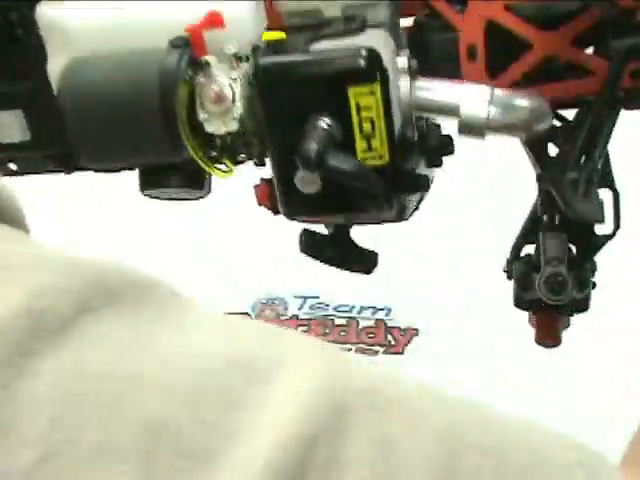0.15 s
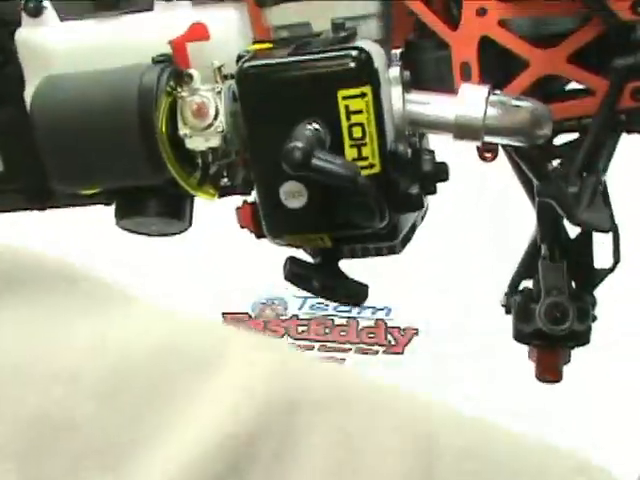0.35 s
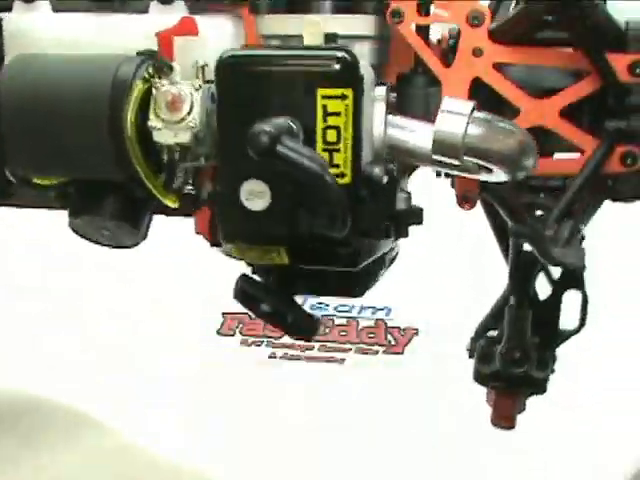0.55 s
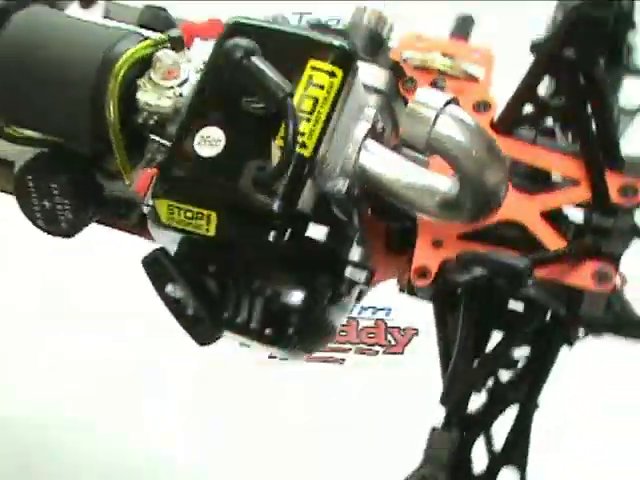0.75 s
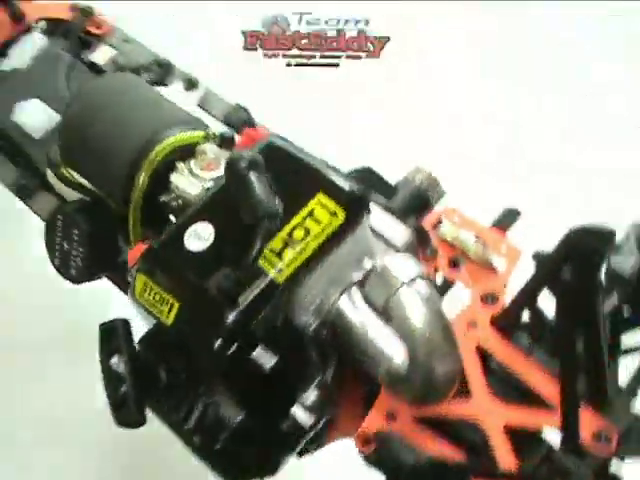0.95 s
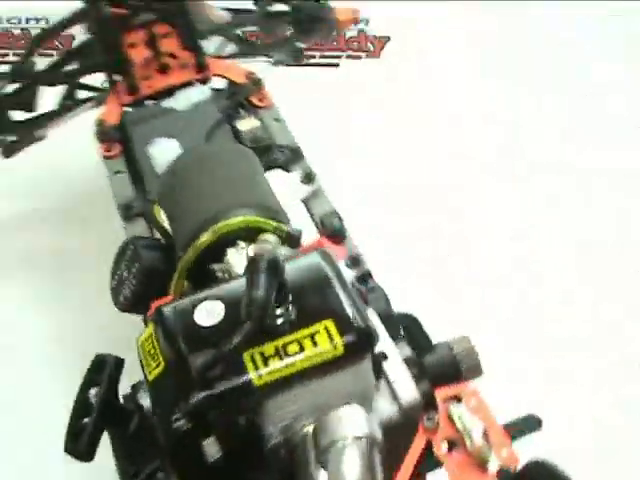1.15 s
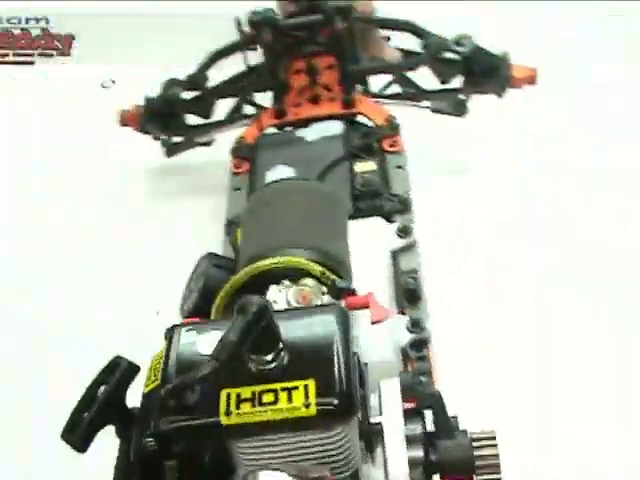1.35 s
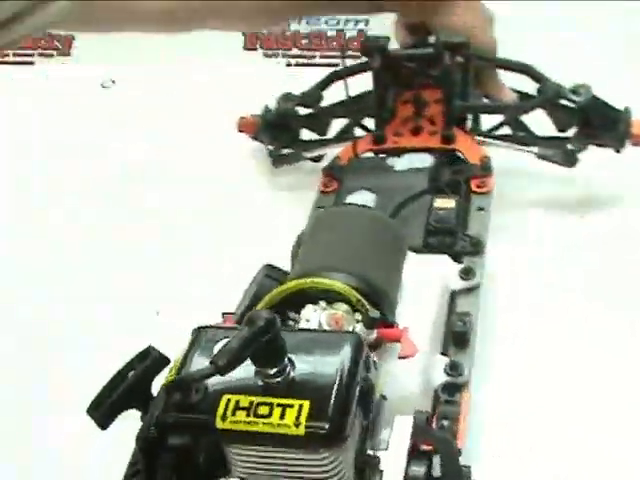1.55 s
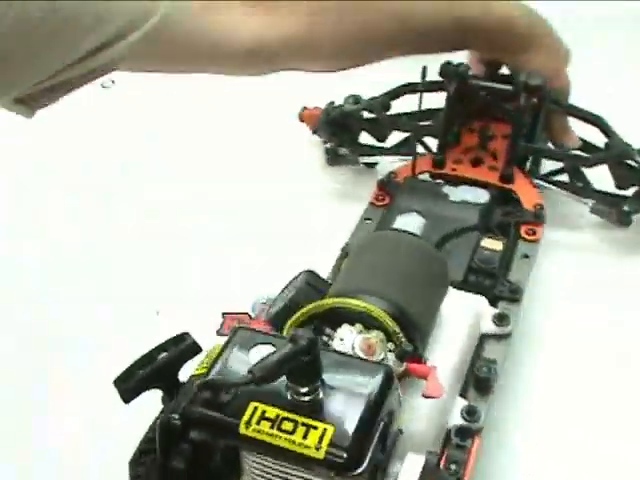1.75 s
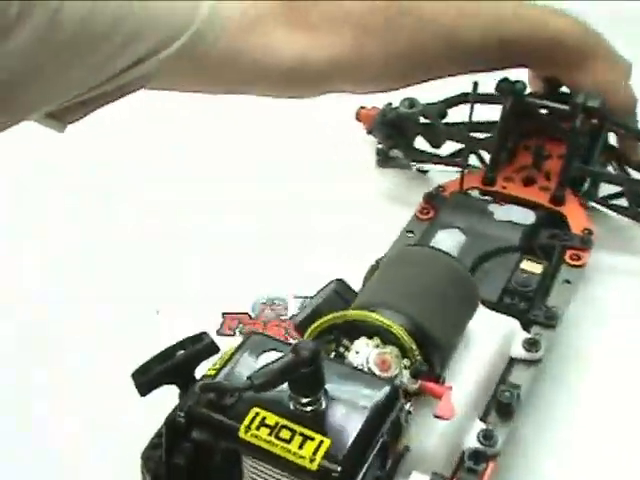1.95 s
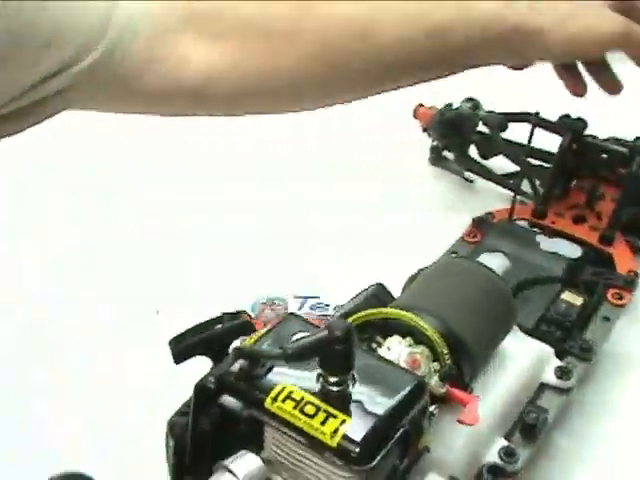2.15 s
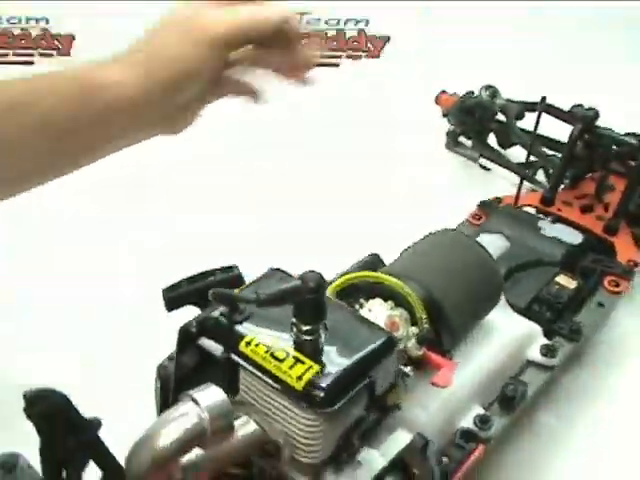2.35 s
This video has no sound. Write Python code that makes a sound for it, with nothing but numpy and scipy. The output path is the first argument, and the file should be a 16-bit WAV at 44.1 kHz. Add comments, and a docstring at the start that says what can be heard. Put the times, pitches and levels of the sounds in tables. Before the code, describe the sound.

Close handling of a metal and plastic model chassis on a table in a small room: scraping bursts, sparse link clicks, a run of woody thumps and a final loud shove, over faint hiss and hum.

```python
"""On a table, near a small camera, a heavy model chassis is dragged and turned while its loose links tick;
then it is knocked down in a run of blows and shoved across the top. Drags are random stick-slip clicks that
ring six parts: table top, floor plate, frame, arms, links and contact hiss. Hits are short noise bursts:
knocks ring all but the table top, ticks only the upper four, and both add notes of their own. Shaped noise
and sines make the camera's hiss, hum and motor whine."""
import sys
import numpy as np
from scipy import signal
from scipy.fft import rfft, irfft
from scipy.io import wavfile
from scipy.ndimage import uniform_filter1d

SR = 44100
rng = np.random.default_rng(int(sys.argv[2]) if len(sys.argv) > 2 else 0)


def store_pcm(level_fs):
    """Save levels as 16-bit WAV."""
    pcm = np.round(np.clip(level_fs, -1, 1) * 32767).astype(np.int16)
    wavfile.write(sys.argv[1], SR, np.atleast_2d(pcm).T)


N = 105928
T = np.arange(N) / SR
RISE_S = .0006  # how fast hits and ticks build up


def undb(db):
    """Turn decibels into a plain gain."""
    return 10 ** (np.asarray(db) / 20)


def unit(x):
    """Scale a sound to an average (rms) level of 1."""
    return x / np.sqrt(np.mean(x ** 2))


def band(x, lo_hz, hi_hz):
    """Keep the sound between two frequencies."""
    sos = signal.butter(2, [lo_hz, min(hi_hz, .45 * SR)], "bandpass", fs=SR, output="sos")
    return signal.sosfilt(sos, x)


def fade(t, t60):
    """Die away by 60 dB in t60 seconds."""
    return np.exp(-np.log(1000) * t / max(t60, .002))


def walk(rate):
    """Wander between random levels, about `rate` of them a second, joined by ramps; rms 1."""
    k = int(SR / rate)
    steps = np.repeat(rng.standard_normal(N // k + 1), k)
    return unit(uniform_filter1d(steps, k)[:N])


def on_log(hz, table):
    """Read a table of values against frequency, joining its points on a log frequency scale."""
    table = np.array(table)
    return np.interp(np.log(np.maximum(hz, 1)), np.log(table[:, 0]), table[:, 1])


def add(into, s, x):
    """Mix a short sound in at s seconds."""
    i = int(s * SR)
    into[..., i:i + x.shape[-1]] += x[..., :N - i]


def ring(db, hz, rise_s, t60):
    """A struck note: a quarter second of sine that builds up, then dies away."""
    t = T[:SR // 4]
    return undb(db) * np.sin(2 * np.pi * hz * t) * (1 - np.exp(-t / rise_s)) * fade(t, t60)


def clatter(t60):
    """The force of one hit: a first blow and a dying burst of contacts, with the energy of 10 ms at rms 1."""
    t = T[:SR // 10]
    burst = rng.standard_normal(len(t)) * (1 - np.exp(-t / RISE_S)) * fade(t, t60)
    burst = burst / np.sqrt(np.sum(burst ** 2))
    first_blow = undb(-13) * (np.arange(len(t)) == int(RISE_S * SR))
    burst = burst + first_blow
    return burst * np.sqrt(SR / 100 / np.sum(burst ** 2))


SLIPS_PER_S, SLIP_SCATTER_DB = 1800, 8
GRAIN_SHARE = 0.5  # share of the rub's power that is clicks; the rest is smooth noise
JUDDER_HZ, JUDDER_DB = 110, 1.3  # random steps per second, spread
WANDER_HZ, WANDER_DB = 44.34, 1.5  # the contact point wanders, so each part swells on its own
# strong drags: [t/s, then level/dB of table top, floor plate, frame, arms, links, contact hiss]
DRAG_LEVELS = [
    [(0.0, -31.5, -24.5, -28.5, -37.5, -41, -46), (0.036, -47.5, -25, -29, -36, -38, -48),
     (0.058, -42, -31.5, -33, -38, -35.5, -45), (0.094, -55, -43, -43, -48, -68, -70),
     (0.102, -52, -49, -50, -48, -47, -58), (0.116, -58, -50, -48, -50, -58, -69),
     (0.126, -59, -52, -62, -56, -43.5, -48), (0.154, -57, -49.5, -61, -65, -66, -73),
     (0.17, -59, -63, -62, -74, -70, -64)],
    [(0.238, -31, -34, -38, -33, -33, -38), (0.248, -28.5, -27.5, -20, -19.5, -28.5, -30.5),
     (0.27, -45, -21, -25.5, -21.5, -28.5, -32.5), (0.312, -47, -26, -18, -24.5, -27.5, -31.5),
     (0.342, -40, -20, -17.5, -24, -31, -33.5)],
    [(0.342, -29, -27, -19.5, -32, -31, -33), (0.372, -53, -29, -23, -34, -36, -36.5),
     (0.412, -37.5, -24, -28.5, -35.5, -35, -42.5), (0.462, -42, -25, -37, -37.5, -46, -55),
     (0.474, -61, -33, -34, -34.5, -50, -56), (0.5, -38, -38.5, -37, -40.5, -45.5, -53),
     (0.522, -44, -43.5, -42, -54, -58, -67), (0.548, -62, -54, -53, -54, -56, -66),
     (0.58, -46, -52, -55, -76, -68, -81)],
    [(2.196, -14.5, -37, -21, -23.5, -24.5, -26.5), (2.224, -22.5, -19.5, -36.5, -32.5, -33.5, -33.5),
     (2.244, -10.5, -33, -24.5, -31, -28, -30), (2.256, -12, -30, -26, -31, -28.5, -28),
     (2.268, -16.5, -19.5, -25.5, -29, -29.5, -32), (2.292, -19, -25.5, -31.5, -33.5, -31.5, -36),
     (2.318, -28.5, -38.5, -40, -43.5, -40, -45), (2.4, -37.5, -50, -55, -57, -56.5, -65)],
]
# light rubbing while the chassis is shifted: [t/s, then level/dB of the same six parts]
RUB_LEVELS = [
    [(0.6, -60, -52.5, -56, -61, -61, -73), (0.7, -60.5, -59, -55, -54, -54.5, -56.5),
     (0.83, -61, -45, -46.5, -47, -46.5, -61), (0.9, -63, -56, -65, -73, -66, -69)],
    [(1.83, -63, -53, -62, -60, -59, -66), (1.854, -53, -46, -50, -56, -61, -64),
     (1.98, -50, -71, -51, -53, -48, -55)],
    [(2.0, -43, -44.5, -52.5, -62, -54, -85), (2.132, -54.5, -40.5, -46, -48.5, -50, -47.5),
     (2.194, -39, -33, -34, -34.5, -33, -39)],
]


def drags():
    """Dragging: surfaces stick and slip in random clicks over a finer, juddering rub; one force per part."""
    chance = rng.random((2, N))
    slips = (chance[0] < SLIPS_PER_S / SR) * undb(SLIP_SCATTER_DB * chance[1])
    clicks = np.sqrt(GRAIN_SHARE) * unit(slips - slips.mean())
    rub = clicks + np.sqrt(1 - GRAIN_SHARE) * rng.standard_normal(N)
    rub = unit(rub * undb(JUDDER_DB * walk(JUDDER_HZ)))
    force = np.zeros((len(PART_RANGES), N))
    for rows in map(np.array, DRAG_LEVELS + RUB_LEVELS):
        for k in range(len(force)):
            level_db = np.interp(T, rows[:, 0], rows[:, 1 + k], -200, -200)  # silent outside the drag
            force[k] += rub * undb(level_db)
    return force * undb(WANDER_DB * np.array([walk(WANDER_HZ) for _ in force]))


# knocks on the table: [t/s, base level/dB, then level/dB against the base of table top, plate, frame, arms,
# links, hiss, then clatter t60/s, plate note f/Hz, note level/dB against the base]
KNOCK_LIST = [(1.8, -15.5, -16, -15, -13, -22.5, -22, -28, 0.094, 582, -0.5),
              (1.826, -28, -32, -35, -8, -10, -22, -36, 0.04, 564, -26),
              (1.872, -37.5, -13, -4, -20, -19, -15, -22, 0.052, 570, 1),
              (1.897, -8.5, -19, -17.5, -16.5, -15.5, -17, -20, 0.048, 500, -5.5),
              (1.915, -23, -12, -8, -11, -14.5, -14, -15.5, 0.15, 710, -5.5),
              (1.951, -28, -10, -16, -16, -33, -34, -32, 0.1, 510, 1),
              (1.985, -13.5, -14.5, -16.5, -15, -24, -22, -27.5, 0.094, 580, 2.5),
              (2.006, -21, -7.5, -38, -12, -14, -18.5, -25, 0.034, 604, -12),
              (2.193, -9, -9, -11, -18, -18, -19, -24, 0.042, 507, -3),
              (2.361, -23.5, -1.5, -32, -30, -35, -38, -38, 0.062, 520, -15)]
# notes of the table top under a knock: [f/Hz, level/dB against the table top's level, t60/s]
TABLE_NOTES = [(170.4, 3, 0.075), (309, -2, 0.21)]
NOTE_T60_S = 0.043


def knocks(force):
    """Knocks: a clatter shakes all parts but the table top, which sounds clean notes beside a plate note."""
    notes = np.zeros(N)
    for s, db, top_db, *rel, t60, hz, note_db in KNOCK_LIST:
        add(force[1:], s, undb(db + np.array(rel))[:, None] * clatter(t60))
        add(notes, s, ring(db + note_db, hz, 0.002, NOTE_T60_S))
        for table_hz, table_db, table_t60 in TABLE_NOTES:
            add(notes, s, ring(db + top_db + table_db, table_hz, 0.0026, table_t60))
    return notes


# ticks of loose links: [t/s, base level/dB, then level/dB against the base of frame, arms, links, hiss,
# then own ring f/Hz, ring level/dB against the base, ring t60/s, clatter t60/s]
TICK_LIST = [(0.0994, -33, -7, -14, -21.5, -30, 1960, -11, 0.061, 0.019),
             (0.1233, -35.5, -8, -16, -23, -16, 1480, -13, 0.05, 0.023),
             (0.5906, -45, -13, -9, -8, -33, 1750, -4, 0.05, 0.036),
             (0.62, -32, -11.5, -9, -28, -30, 2180, -16, 0.048, 0.0069),
             (0.6675, -40.5, -22, -28, -9, -8, 1750, -9, 0.05, 0.023),
             (0.7055, -28.5, -25, -22, -9, -16, 5960, -6, 0.054, 0.074),
             (0.7486, -32, -8, -28, -11, -12, 1420, -7, 0.037, 0.088),
             (0.7696, -23, -17.5, -30, -15, -18, 5380, -5.5, 0.066, 0.15),
             (0.9096, -15.5, -15, -14.5, -11, -15.5, 1730, -8.5, 0.11, 0.076),
             (1.064, -31, -21, -18.5, -19.5, -19.5, 1970, -8, 0.06, 0.035),
             (1.5445, -41.5, -21, -13, -15, -14, 1860, -5, 0.05, 0.094),
             (1.612, -40.5, -15, -17, -34, -24, 1850, 3.5, 0.026, 0.018),
             (2.0833, -42, -15, -18, -32, -38, 1810, -6, 0.046, 0.013)]


def ticks(force):
    """Loose links tick: a small clatter shakes the upper four parts and the link rings at its own pitch."""
    rings = np.zeros(N)
    for s, db, *rel, hz, ring_db, ring_t60, t60 in TICK_LIST:
        add(force[2:], s, undb(db + np.array(rel))[:, None] * clatter(t60))
        add(rings, s, ring(db + ring_db, hz, RISE_S, ring_t60))
    return rings


# table legs boom, thin metal whistles: [t/s, level/dB before rise and fade, f/Hz, rise/s, t60/s]
LONG_RINGS = [(1.902, -31, 73.44, 0.004, .2), (2.2, -30, 67.9, 0.0067, 0.38), (2.3, -24, 68, 0.0059, 0.24),
              (.77, -45, 9800, .001, .08), (.771, -42, 6100, .002, .06), (.785, -41, 4700, .004, .08),
              (.912, -36, 1147, .002, .07), (.911, -33, 3600, .002, .1), (2.212, -31, 9630, .004, 0.14),
              (2.285, -40, 9660, .006, 0.12)]


def long_rings():
    """Table legs and thin metal parts ring on as single dying sines."""
    rings = np.zeros(N)
    for s, db, hz, rise_s, t60 in LONG_RINGS:
        add(rings, s, ring(db, hz, rise_s, t60))
    return rings


# range of table top, floor plate, frame, arms, links, contact hiss: [low f/Hz, high f/Hz]
PART_RANGES = [(175, 417), (470, 900), (1040, 2063), (1900, 2863), (2850, 7330), (7000, 10000)]
# natural notes of table and chassis: [f/Hz, level/dB with longer notes scaled down, t60/s]
BODY_MODES = [(185, -2, .15), (245, 2, .14), (280, -2, .12), (338, -2, .1), (385, -11, .08), (520, -6, .06),
              (570, 0, .08), (650, 0, .08), (740, -3, .06), (790, -7, .05), (1150, -6, .04),
              (1270, -3, .05), (1360, 0, .07), (1530, -5, .05), (1690, -2, .07), (1800, -3, .06),
              (1970, 0, .06), (2240, -3, .05), (2410, -3, .04), (2560, -1, .07), (3300, 0, .03),
              (3700, -2, .03), (4300, -3, .03), (5200, -3, .03), (6100, -4, .03)]
# dull thud of each part in the same order: [level/dB against its notes]
THUD_LEVELS = [-2.5, -9.5, 10.5, 4, 18, 0]


def parts():
    """How each part answers one click: its notes plus an unpitched thud, kept to its own range; energy 1."""
    t = T[:SR // 3]
    click = 1. * (t == 0)
    answers = []
    for (lo, hi), thud_db in zip(PART_RANGES, THUD_LEVELS):
        answer = undb(thud_db) * unit(band(click, lo, hi))
        modes = [undb(db) * np.sin(2 * np.pi * hz * t) * fade(t, t60) / np.sqrt(t60)
                 for hz, db, t60 in BODY_MODES if lo <= hz < hi]
        if modes:
            answer = band(answer + unit(sum(modes)), lo, hi)
        answers.append(unit(answer) / np.sqrt(len(t)))
    return answers


PLATE_SPLIT_HZ = 690
# balance of the plate as the weight shifts: [t/s, upper against lower notes level/dB]
PLATE_BALANCE = [(0.05, -3), (0.25, 9), (0.3, 5), (0.34, -4), (0.42, -7), (0.5, -4), (0.8, 2), (2.05, -6),
                 (2.2, -2)]


def tilt_plate(plate):
    """As the weight shifts, the plate favours its upper or its lower notes."""
    lower = signal.sosfiltfilt(signal.butter(4, PLATE_SPLIT_HZ, fs=SR, output="sos"), plate)
    tilt = undb(np.interp(T, *np.array(PLATE_BALANCE).T))
    return (lower + tilt * (plate - lower)) * np.sqrt(2 / (1 + tilt ** 2))


RING_FLUTTER_DB = 4  # furthest swing up or down


def chassis():
    """Drags shake every part, knocks all but the table top, ticks the upper four; higher rings flutter."""
    force = drags()
    notes = knocks(force)
    rings = ticks(force) + long_rings()
    flutter = band(rings * undb(RING_FLUTTER_DB * np.tanh(walk(320))), 470, 15000)
    body = [signal.fftconvolve(f, answer)[:N] for f, answer in zip(force, parts())]
    body[1] = tilt_plate(body[1])
    return band(rings, 30, 360) + flutter + notes + sum(body)


FAINT_PER_S, FAINT_DB = 60, -54  # ticks are up to 10 dB softer than this
FAINT_HZ, FAINT_T60_S = 1850, 0.025


def jiggle():
    """One loose link jiggles faintly all along: scattered ticks, each ringing two close tones."""
    chance, t = rng.random((2, N)), T[:SR // 10]
    faint_ticks = (chance[0] < FAINT_PER_S / SR) * undb(FAINT_DB - 10 * chance[1])
    link = np.sin(2 * np.pi * FAINT_HZ * t) + 0.39 * np.sin(2 * np.pi * 1.1 * FAINT_HZ * t)
    return signal.fftconvolve(faint_ticks, link * fade(t, FAINT_T60_S))[:N]


# how the sound reaches the left side ahead of the right: [f/Hz, lead/radians]
LEFT_LEAD = [(60, 0.48), (260, 1.42), (780, 0.85), (1400, 0.58), (2400, 0.33), (5000, 0.36), (9000, -0.28),
             (14000, -1.03)]
# loudness of left against right: [f/Hz, level/dB]
LEFT_LEVEL = [(100, -0.5), (500, .9), (5000, 1.6), (14000, -1)]


def near_sound(dry):
    """The direct sound in stereo: timing and level differ between left and right with frequency."""
    hz = np.fft.rfftfreq(N, 1 / SR)
    lead, left_db = on_log(hz, LEFT_LEAD), on_log(hz, LEFT_LEVEL)
    # each side takes half the difference
    sides = [np.exp(.5j * w * lead) * undb(w * left_db / 2) for w in (1, -1)]
    return np.array([irfft(rfft(dry) * side, N) for side in sides])


ROOM_T60_S, ROOM_DB, ROOM_TOP_HZ = 0.16, -14.5, 8900


def room(dry):
    """Room echoes: a separate dying noise tail for each side smears the sound."""
    t = T[:SR // 2]
    echoes = []
    for _ in range(2):
        noise = band(rng.standard_normal(len(t)), 84, ROOM_TOP_HZ)
        tail = unit(noise * fade(t, ROOM_T60_S) * (t > .006))  # the first echo comes after 6 ms
        echoes.append(signal.fftconvolve(dry, tail)[:N])
    return np.array(echoes) * undb(ROOM_DB) / np.sqrt(len(t))


HISS_LEVEL_DB, FLICKER_DB = -52.5, .8  # rms of the middle hiss before flicker, spread of the flicker
HUM_HZ, HUM_WIDTH_HZ, HUM_DB = 55, 2.5, -56  # middle pitch, pitch spread, rms before its wavering
# colour of the hiss: [f/Hz, relative level/dB]
HISS_COLOUR = [(53, -44), (90, -13.5), (122, -11), (488, -17.5), (593, -16.5), (769, -21.5), (1910, -19.5),
               (2230, -21), (16000, -30.5)]
# stereo width of the hiss: [f/Hz, side against middle level/dB]
HISS_WIDTH = [(60, -33), (110, -15), (200, -15), (380, -6), (700, 0.5), (1290, -4), (8120, -4.5),
              (15000, -16)]
# thin motor lines: [f/Hz, peak level/dB before wavering]
MOTOR_LINES = [(600.5, -57), (958.2, -69), (1922, -73)]


def camera():
    """The camera: coloured noise hiss, a low wavering hum, a soft rumble and thin motor tones."""
    hz = np.fft.rfftfreq(N, 1 / SR)
    shape = undb(on_log(hz, HISS_COLOUR)) * (hz > 85)
    mid = irfft(rfft(rng.standard_normal(N)) * shape, N)
    side = irfft(rfft(rng.standard_normal(N)) * shape * undb(on_log(hz, HISS_WIDTH)), N)
    hiss = mid + side * np.array([[1], [-1]])
    hiss = hiss * undb(HISS_LEVEL_DB + FLICKER_DB * walk(11.55)) / np.std(mid)
    hum_phase = 2 * np.pi * np.cumsum(HUM_HZ + HUM_WIDTH_HZ * walk(4.88)) / SR
    hum = np.sqrt(2) * np.sin(hum_phase) * undb(HUM_DB + 3.4 * walk(6.0))
    rumble = undb(-62.5) * unit(band(rng.standard_normal(N), 27, 54))
    whine = sum(undb(db + walk(14.7)) * np.sin(2 * np.pi * f * T) for f, db in MOTOR_LINES)
    return hiss + hum + rumble + whine


def scene():
    """The chassis and its jiggling link, heard directly and through the room, over the camera noise."""
    dry = chassis() + jiggle()
    return near_sound(dry) + room(dry) + camera()


MIC_TOP_HZ, TOP_HZ = 12400, 16000  # gentle dulling, steep cut
ROUND = .8  # ceiling that the rounded peaks approach


def record(dry):
    """The microphone dulls the treble; the camera rounds the loudest peaks and cuts the top off."""
    dull = signal.lfilter(*signal.butter(1, MIC_TOP_HZ, fs=SR), dry)
    rounded = ROUND * np.tanh(dull / ROUND)
    return signal.sosfilt(signal.ellip(10, .2, 80, TOP_HZ, fs=SR, output="sos"), rounded)


dry = scene()
out = record(dry)
store_pcm(out)
```